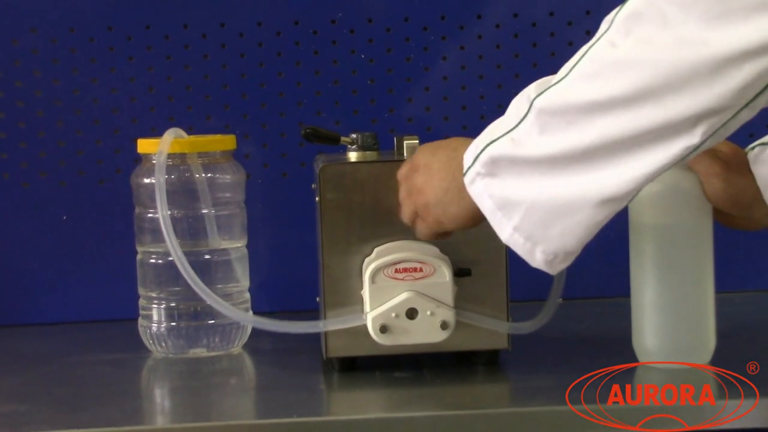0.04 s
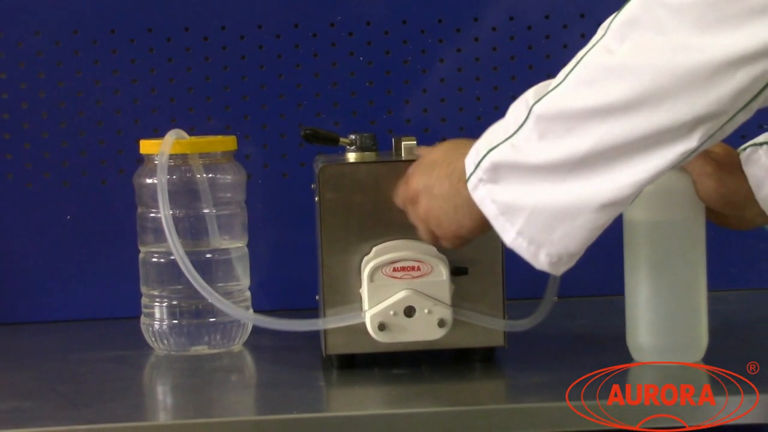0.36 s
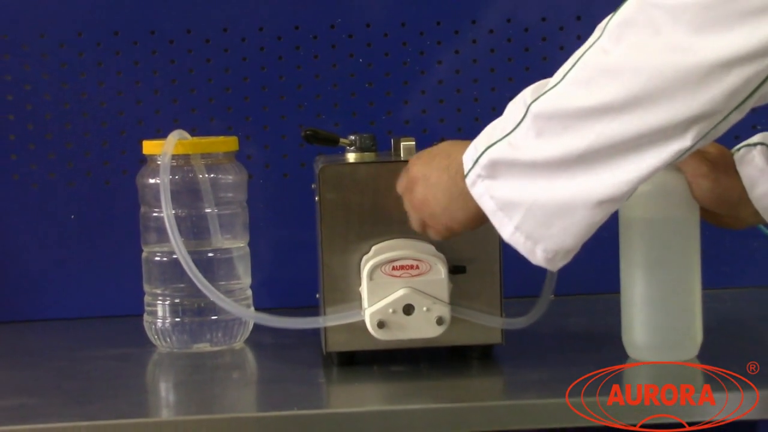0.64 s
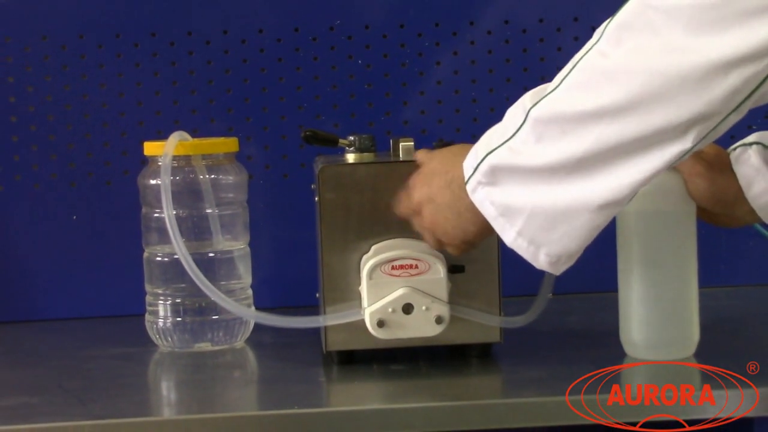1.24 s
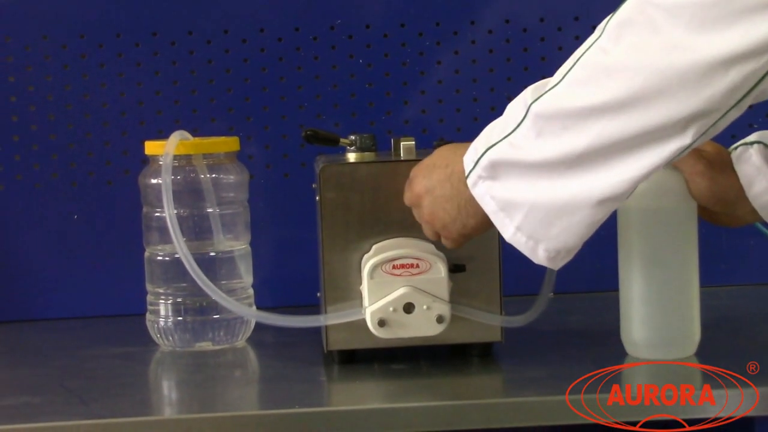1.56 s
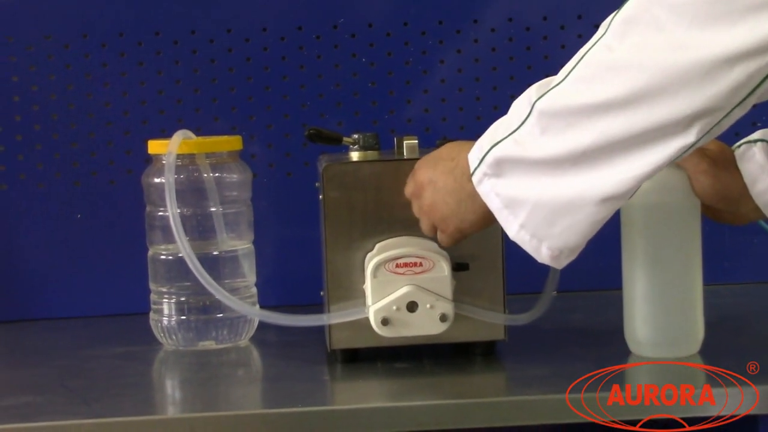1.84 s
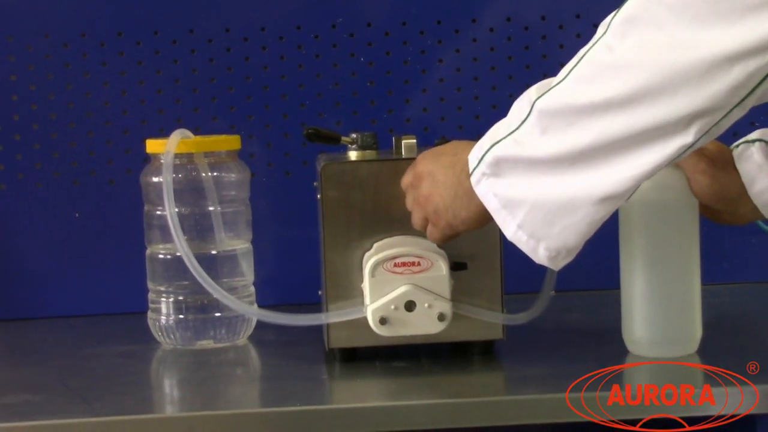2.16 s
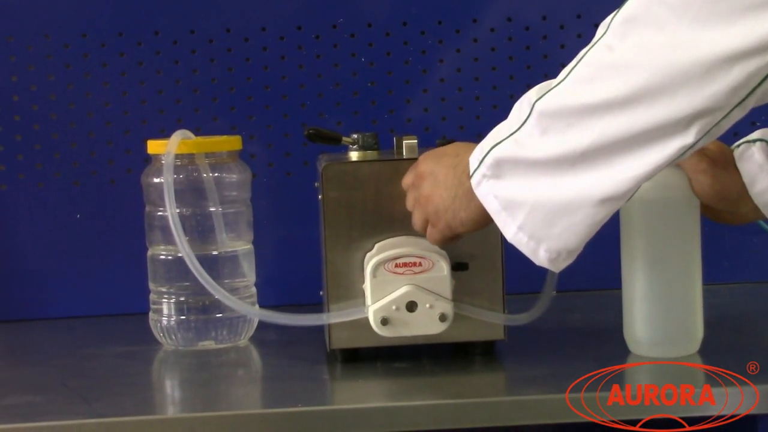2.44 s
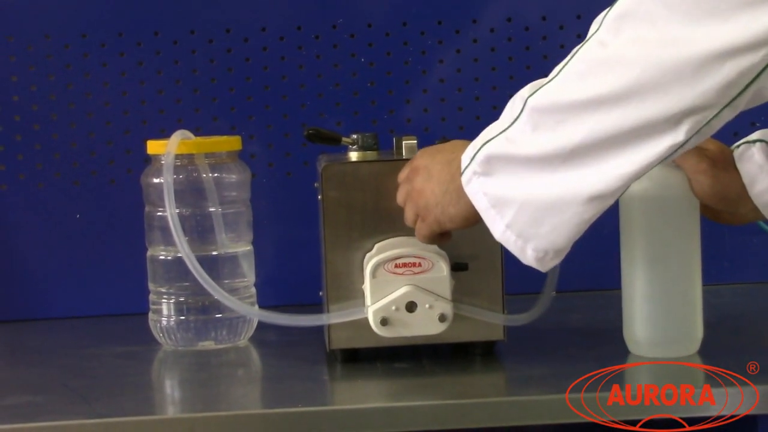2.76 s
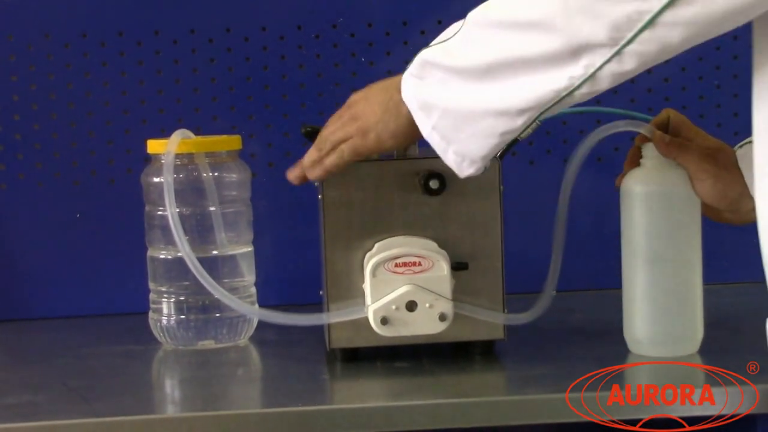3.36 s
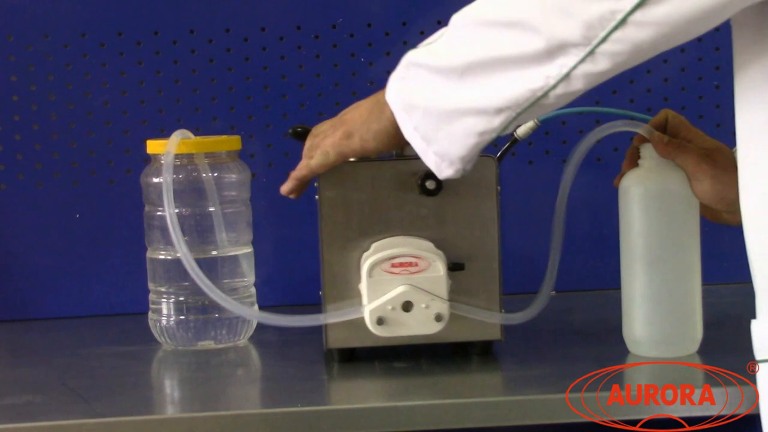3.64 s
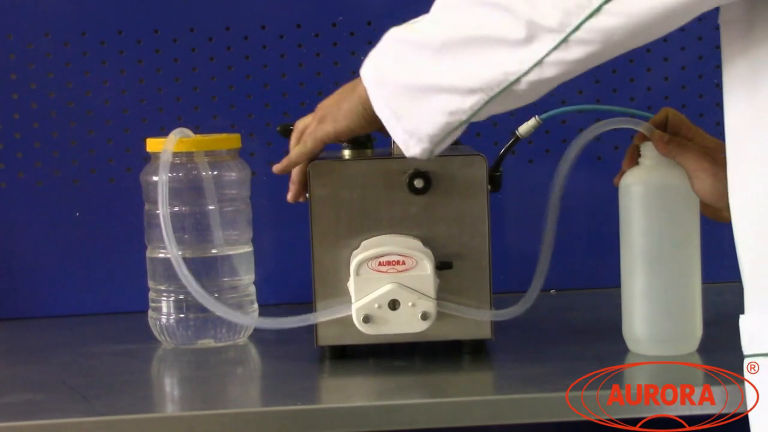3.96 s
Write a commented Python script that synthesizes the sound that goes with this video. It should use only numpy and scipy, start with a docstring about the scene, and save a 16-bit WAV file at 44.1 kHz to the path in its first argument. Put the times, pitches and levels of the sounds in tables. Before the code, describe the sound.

A small electric pump whines and buzzes in its metal case, slowly dropping a little in pitch. Behind it a fan drones, rushes and faintly rattles. At the very end the whine sags and a bright hiss swells.

```python
"""On a steel bench, a small peristaltic pump runs while its speed knob is eased down.
Its stepper motor whines in the metal case; partials swell and fade across the panel resonances.
Behind it a steady fan rushes, drones and rattles once a turn.
In the last moment the whine sags and a bright hiss swells."""
import sys
import numpy as np
from scipy import signal
from scipy.fft import rfft, irfft
from scipy.io import wavfile
from scipy.ndimage import uniform_filter1d, minimum_filter1d

SR = 44100
rng = np.random.default_rng(int(sys.argv[2]) if len(sys.argv) > 2 else 0)


def generate_wav(signal):
    """Clip the signal to [-1, 1] and save it as 16-bit WAV at the path in sys.argv[1]."""
    frames = np.transpose(np.atleast_2d(signal))
    scaled = np.clip(frames, -1, 1) * 32767
    pcm = np.round(scaled).astype(np.int16)
    wavfile.write(sys.argv[1], SR, pcm)


N = 176400

# air through the case: f/Hz, density/dB
AIR_SPECTRUM = [(25, -85), (80, -85), (130, -73.5), (180, -70.5), (260, -59), (320, -63), (420, -58),
                (600, -56.5), (750, -53.5), (1000, -57.5), (1300, -60), (1700, -61.5), (2200, -58),
                (2900, -64.5), (3700, -64), (5300, -68.5), (6200, -69.5), (8500, -70.5), (10600, -70.5),
                (11600, -79.5), (13200, -80), (14400, -88.5)]
# stereo width of air and hiss: f/Hz, side re mid/dB
SIDE_SPECTRUM = [(30, -36), (250, -25.5), (1000, -13), (2000, -7), (5000, -13.5), (9000, -17.5),
                 (12000, -14)]
# fan hum: multiple of turn rate, level/dB
DRONE_PARTIALS = [(2, -59.5), (3, -51.5), (4, -37), (5, -33.5), (7, -31), (8, -26.5), (9, -29.5), (10, -36),
                  (11, -31), (12, -31.5), (13, -35), (14, -26.5), (15, -26.5), (16, -34.5), (17, -49),
                  (18, -46), (19, -31), (20, -33.5), (21, -37), (23, -39.5), (24, -33.5), (26, -38),
                  (27, -69), (31, -38.5), (32, -46), (34, -59), (36, -36.5), (37, -56), (39, -41),
                  (40, -38), (48, -86), (52, -33.5), (54, -41.5), (132, -47.5)]
# fan parts: f/Hz, width/Hz, level/dB, depth of 3-per-turn beat, repeating share, L-R/dB
RATTLE_MODES = [(3730, 100, -41, .1, 0.51, -3), (6406, 85, -43, .1, 0.44, -5),
                (6850, 90, -46, .1, .3, -7.5), (7220, 69, -49, .1, .3, 0), (7445, 97, -37.5, .1, 0.28, 0),
                (8240, 170, -45.5, .1, .2, 4), (8680, 90, -51, .1, .3, 0), (9420, 110, -45, .2, .3, 5),
                (9875, 240, -36, 0.38, 0.55, -9), (10260, 71, -43.5, .3, .5, 8)]
# closing hiss: f/Hz, density/dB
HISS_SPECTRUM = [(100, -71), (400, -48), (650, -56), (780, -46), (950, -57), (1300, -55), (1800, -46),
                 (2600, -56.5), (5500, -64.5), (7500, -59), (8000, -57), (8330, -48.5), (8700, -62),
                 (9200, -60.5), (12000, -67.5), (14500, -75)]
# case modes: f/Hz, width/Hz, peak level/dB, step rate at peak/Hz, step rate spread/Hz
CASE_MODES = [(1466, 110, -29.5, 652, 16), (4070, 110, -37, 654, 8.6), (5950, 340, -36, 648, 13),
              (12700, 220, -50, 638, 8)]
# pump motor: t/s, step rate/Hz
STEP_RATE = [(0, 656), (.33, 651.8), (.66, 652), (.9, 638), (1.11, 640), (1.59, 637.7), (1.74, 634.6),
             (2.01, 630), (2.37, 622.2), (3.27, 623.2), (3.45, 623.5), (3.55, 627.7), (3.915, 625),
             (3.95, 607), (4, 603)]
# steadier whine partials: t/s, relative level/dB at 1, 2, 5, 6, 7 x step rate
STEADY_LEVELS = [(0.0, -13.5, -27.5, -31, -35, -29.5), (0.7, -14, -27.5, -31, -46.5, -33),
                 (0.85, -15.5, -27, -37, -43, -31.5), (1.65, -16, -27.5, -38, -40, -31.5),
                 (1.85, -20.5, -25.5, -46, -39, -28.5), (2.15, -21, -24, -43, -44.5, -38.5),
                 (2.3, -25.5, -25.5, -38, -44.5, -40), (2.65, -21.5, -25, -37, -48, -43),
                 (3.0, -23.5, -22, -41.5, -45, -41.5), (3.65, -26.5, -22, -31, -46, -39),
                 (3.9, -26, -24, -40, -40, -37.5)]
# partials that ring the panels: t/s, relative level/dB at 3, 4 x step rate
PANEL_LEVELS = [(0.0, -20, -30), (0.05, -18.5, -19.5), (0.15, -16.5, -24), (0.3, -15.5, -23),
                (0.45, -16.5, -34.5), (0.6, -16.5, -23.5), (0.7, -18, -27.5), (0.75, -30, -25),
                (0.8, -27, -29), (0.85, -18, -19), (0.95, -29.5, -19.5), (1.05, -33, -20),
                (1.1, -26, -18.5), (1.5, -29.5, -20.5), (1.55, -23, -18.5), (1.7, -26.5, -18.5),
                (1.8, -20.5, -19), (2.05, -26, -16.5), (2.15, -20, -19), (2.25, -16.5, -21.5),
                (2.5, -17.5, -26.5), (2.55, -15.5, -21.5), (2.75, -21, -23.5), (2.8, -17, -26),
                (3.0, -22, -21.5), (3.15, -14, -22.5), (3.25, -17, -18), (3.45, -17, -21.5),
                (3.6, -22.5, -16), (3.9, -15, -20)]
# multiples of the step rate, in the column order of the two tables above
STEP_MULTIPLES = [1, 2, 5, 6, 7, 3, 4]
# whine partials, same order: flutter depth, roughness
WHINE_TEXTURE = [(0.045, 0), (.05, 0.1), (0.59, 0.18), (0.45, .3), (.9, 0.26), (0.052, 0.15), (.27, 0.14)]
# uneven steps: multiple of step rate / 5, level/dB
BUZZ_PARTIALS = [(2, -41.5), (6, -34), (7, -51.5), (9, -45.5), (11, -35.5), (12, -44.5), (13, -37),
                 (14, -34), (16, -40), (17, -43), (19, -43.5), (21, -49), (24, -48.5), (29, -44),
                 (30, -46.5), (31, -59), (34, -46.5), (40, -50), (45, -58), (46, -52)]

FAN_HZ = 48.412
STEPS_PER_BUZZ, STEPS_PER_FLUTTER = 5, 20
TIME_S = np.arange(N) / SR
BINS_HZ = np.arange(N // 2 + 1) * SR / N
LEFT_RIGHT = np.array([[1], [-1]])


def undb(db):
    return 10 ** (np.asarray(db) / 20)


def curve(table, column=1):
    """Table column, linear in time."""
    rows = np.array(table)
    return np.interp(TIME_S, rows[:, 0], rows[:, column])


def walk(rate_hz):
    """Smooth random drift, standard deviation 1."""
    drift = irfft(rfft(rng.standard_normal(N)) / (1 + (BINS_HZ / rate_hz) ** 2), N)
    return drift / drift.std()


def colour(x, spectrum):
    """Filter by (f/Hz, gain/dB) points."""
    hz, db = np.array(spectrum).T
    return irfft(rfft(x) * undb(np.interp(np.log(BINS_HZ + 1), np.log(hz), db)), N)


def ring(x, hz, width_hz):
    """Steep resonance, output rms 1."""
    b, a = signal.iirpeak(hz, hz / (width_hz * np.sqrt(2)), fs=SR)
    ringing = signal.lfilter(b, a, signal.lfilter(b, a, x))
    return ringing / ringing.std()


def wide_noise(spectrum):
    """Stereo noise of given density, narrowest in the bass."""
    mid, side = rng.standard_normal((2, N)) * np.sqrt(SR / 2)
    return colour(mid, spectrum) + LEFT_RIGHT * colour(colour(side, SIDE_SPECTRUM), spectrum)


def partial(phase, db, rough, rate_hz):
    """Sine with random waver in amplitude and phase."""
    in_phase = (1 + rough * walk(rate_hz)) * np.cos(phase)
    quadrature = rough * walk(rate_hz) * np.sin(phase)
    return np.sqrt(2) * undb(db) * (in_phase + quadrature)


def air_rush(turn_rad, pulse_depth=0.026, flicker_db=0.37):
    """Air rushes through the case, pulsing slightly with the fan."""
    pulse = 1 + pulse_depth * np.cos(turn_rad)
    return wide_noise(AIR_SPECTRUM) * pulse * undb(flicker_db * walk(19))


def fan_drone(turn_rad, blur_rad=0.28, knock_below_hz=645):
    """Low partials align in one soft knock a turn; the case scatters the higher ones."""
    out = 0
    for k, db in DRONE_PARTIALS:
        scatter_rad = min(blur_rad + (k * FAN_HZ / knock_below_hz) ** 4, np.pi)
        out += partial(k * turn_rad + scatter_rad * rng.standard_normal(), db, rough=0.18, rate_hz=2.4)
    return out


def fan_rattle(turn_rad, once_depth=0.23):
    """Scraping, partly repeating each turn, rings small metal parts, each at its own angle."""
    out = 0
    for hz, width_hz, db, thrice_depth, share, pan_db in RATTLE_MODES:
        angle = turn_rad + rng.uniform(0, 2 * np.pi)
        repeated = np.resize(rng.standard_normal(round(SR / FAN_HZ)), N)
        scrape = np.sqrt(share) * repeated + np.sqrt(1 - share) * rng.standard_normal(N)
        beat = np.exp(once_depth * np.cos(angle) + thrice_depth * np.cos(3 * angle))
        out += ring(scrape * beat, hz, width_hz) * undb(db + LEFT_RIGHT * pan_db / 2)
    return out


def closing_hiss(start_s=3.91, rise_s=0.055):
    """Bright hiss swells at the end."""
    return wide_noise(HISS_SPECTRUM) * np.clip((TIME_S - start_s) / rise_s, 0, 1)


def case_whirr(step_hz):
    """Each case mode wakes as the motor passes its speed."""
    out = 0
    for hz, width_hz, db, peak_step_hz, spread_hz in CASE_MODES:
        drive = np.exp(-((step_hz - peak_step_hz) / spread_hz) ** 2 / 2)
        out += ring(rng.standard_normal(N), hz, width_hz) * undb(db) * drive
    return out


def stepper_whine(step_hz, wander_hz=0.512, swing_rad=0.33, whine_gain_db=0.5):
    """Steps whine, uneven steps buzz; the rotor flutters more as it slows."""
    calm_hz, calm_range_hz = 637, 13.4
    fade_end_s, fade_s = 3.965, 0.03
    step_rad = 2 * np.pi * np.cumsum(step_hz + wander_hz * walk(9.26)) / SR
    flutter = np.cos(step_rad / STEPS_PER_FLUTTER + 0.16 * walk(1.1))
    flutter *= np.clip((calm_hz - step_hz) / calm_range_hz, 0.35, 1)
    levels_db = [curve(table, column) + whine_gain_db
                 for table in (STEADY_LEVELS, PANEL_LEVELS) for column in range(1, len(table[0]))]
    out = 0
    for k, db, (depth, rough) in zip(STEP_MULTIPLES, levels_db, WHINE_TEXTURE):
        offset_rad = k * k * np.pi / 4
        phase = k * step_rad + swing_rad * flutter + offset_rad
        out += partial(phase, db, rough, rate_hz=30) * (1 + depth * flutter)
    for k, db in BUZZ_PARTIALS:
        phase = k * step_rad / STEPS_PER_BUZZ + rng.uniform(0, 2 * np.pi)
        out += partial(phase, db, rough=0.34, rate_hz=3.7)
    return out * np.clip((fade_end_s - TIME_S) / fade_s, 0.15, 1)


def scene(lean_db=0.28):
    """Fan and pump in one case, straight ahead; tones lean slightly left."""
    step_hz = curve(STEP_RATE)
    turn_rad = 2 * np.pi * np.cumsum(FAN_HZ + 0.013 * walk(2.32)) / SR
    tones = (stepper_whine(step_hz) + fan_drone(turn_rad)) * undb(LEFT_RIGHT * lean_db / 2)
    return tones + case_whirr(step_hz) + fan_rattle(turn_rad) + air_rush(turn_rad) + closing_hiss()


def record(dry, ceiling=0.92, window_samples=441, cutoff_hz=14500):
    """Peak limiter, then steep low-pass."""
    gain = np.minimum(1, ceiling / (np.abs(dry).max(axis=0) + 1e-9))
    gain = uniform_filter1d(minimum_filter1d(gain, window_samples), window_samples)
    lowpass = signal.ellip(10, 0.1, 80, cutoff_hz, fs=SR, output="sos")
    return signal.sosfilt(lowpass, dry * gain)


dry = scene()
out = record(dry)
generate_wav(out)
```